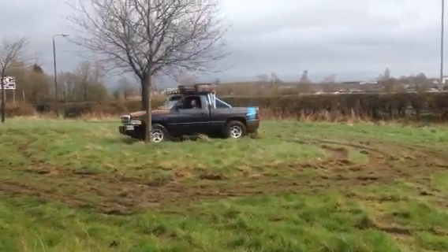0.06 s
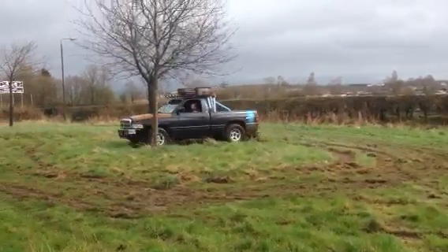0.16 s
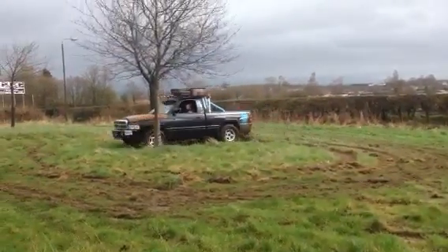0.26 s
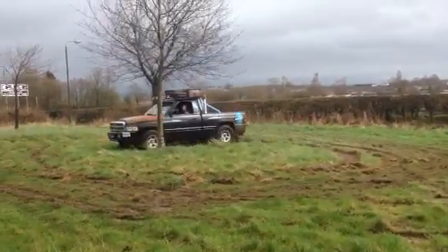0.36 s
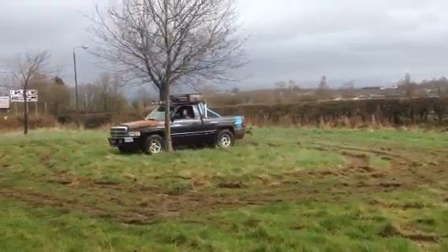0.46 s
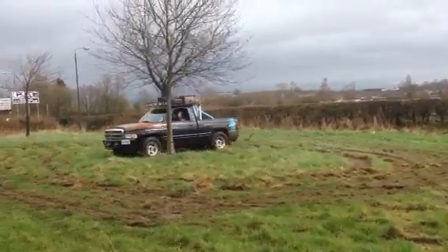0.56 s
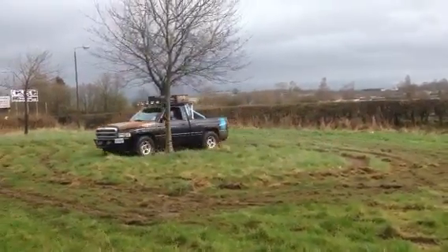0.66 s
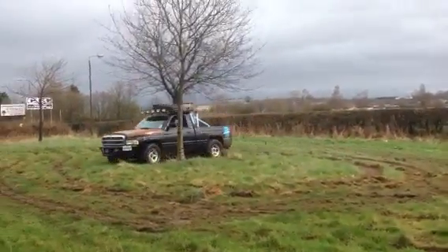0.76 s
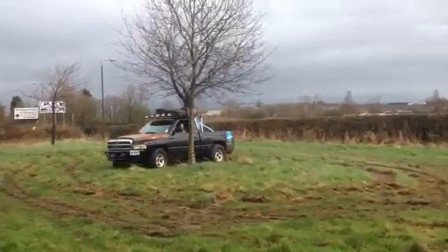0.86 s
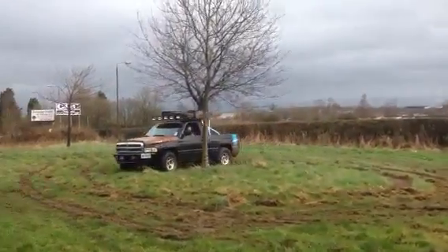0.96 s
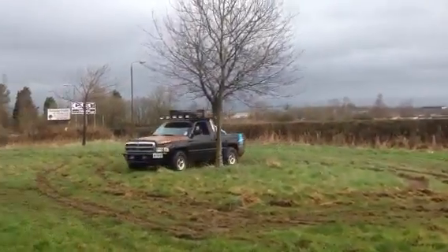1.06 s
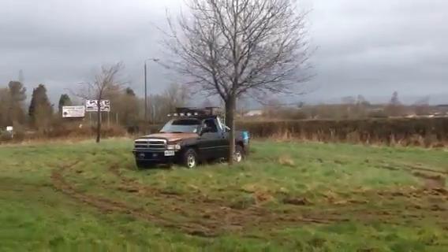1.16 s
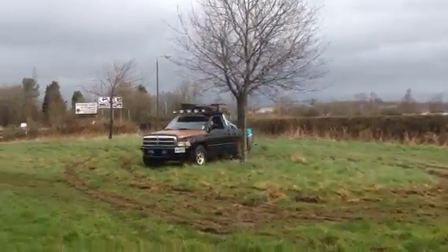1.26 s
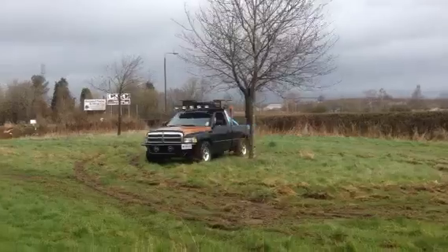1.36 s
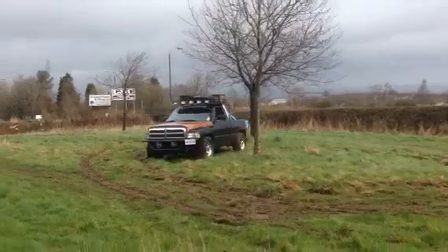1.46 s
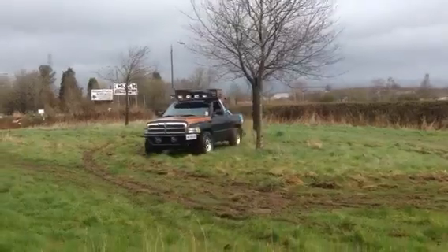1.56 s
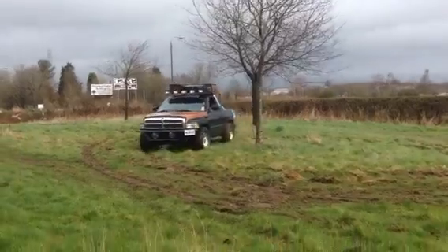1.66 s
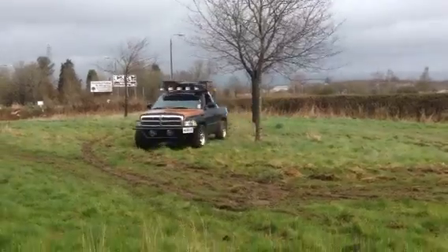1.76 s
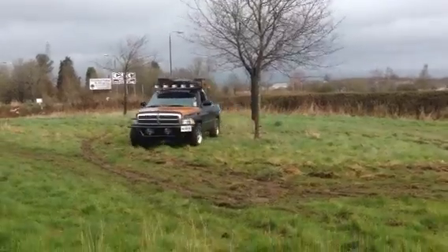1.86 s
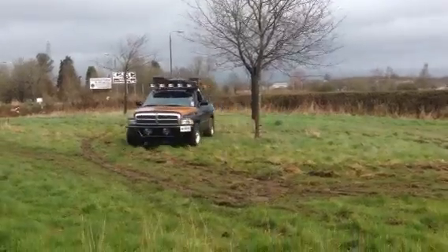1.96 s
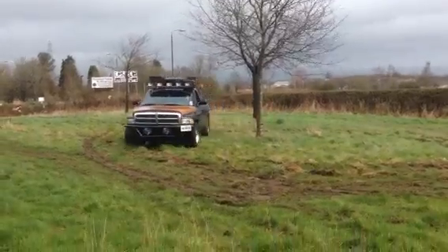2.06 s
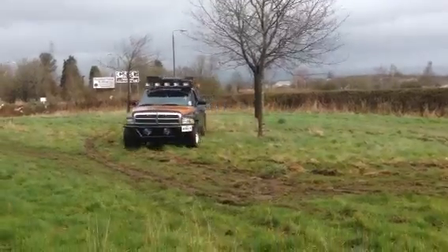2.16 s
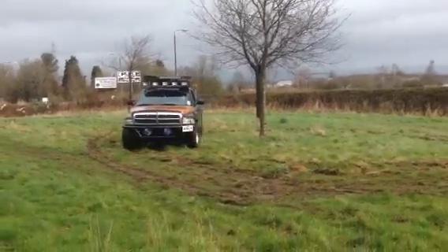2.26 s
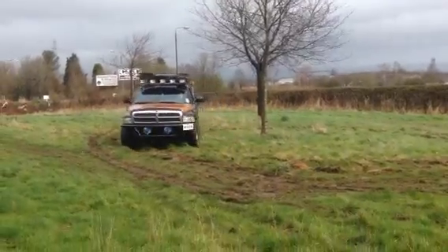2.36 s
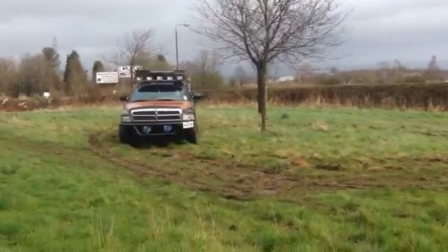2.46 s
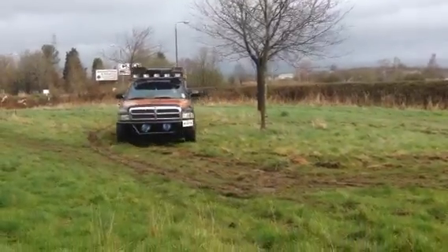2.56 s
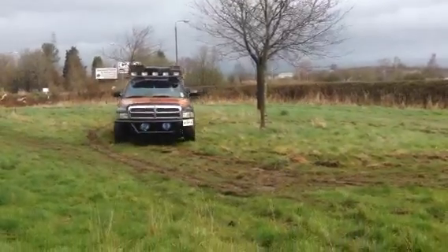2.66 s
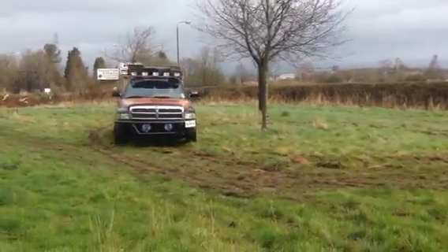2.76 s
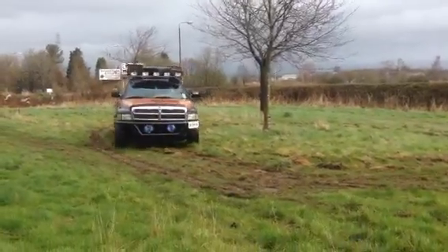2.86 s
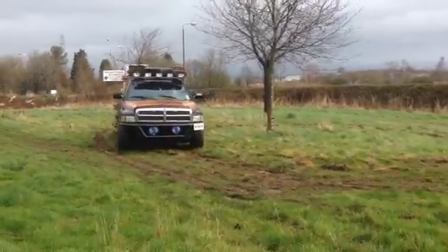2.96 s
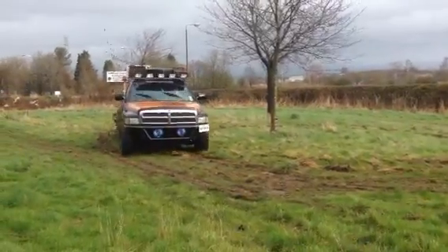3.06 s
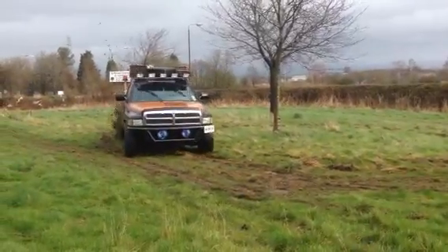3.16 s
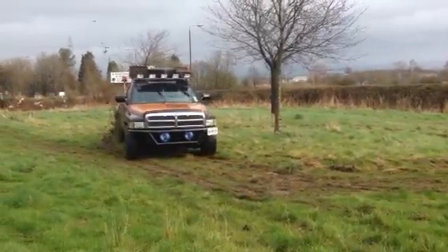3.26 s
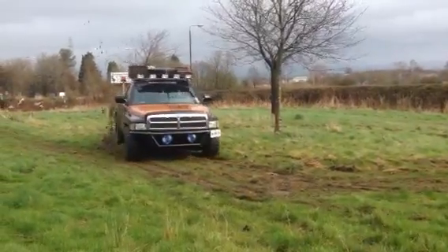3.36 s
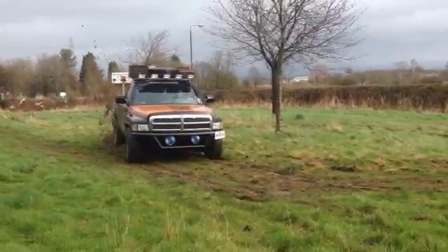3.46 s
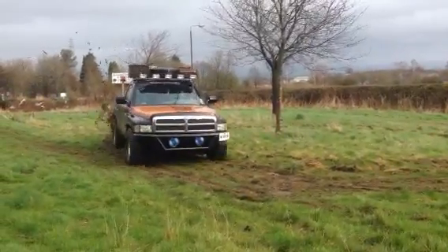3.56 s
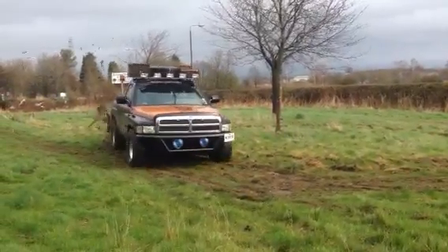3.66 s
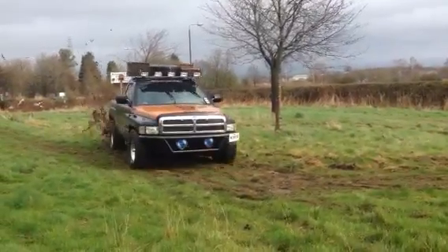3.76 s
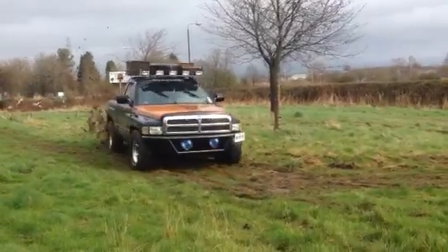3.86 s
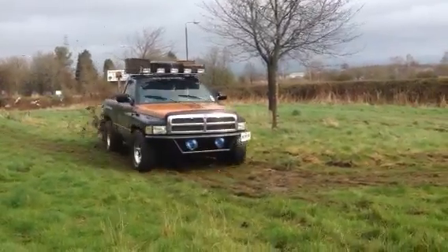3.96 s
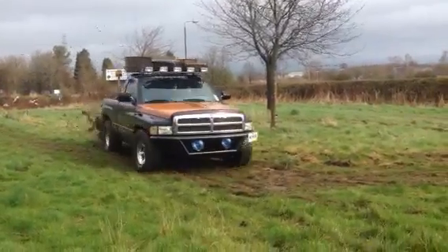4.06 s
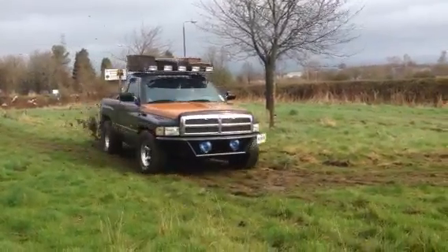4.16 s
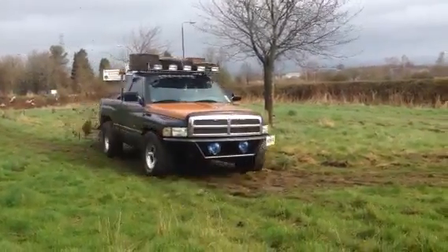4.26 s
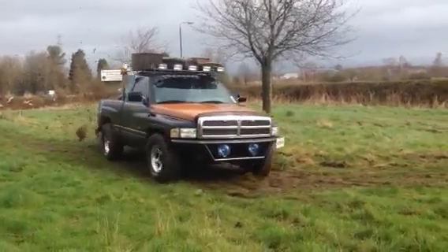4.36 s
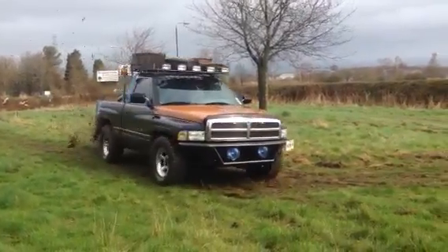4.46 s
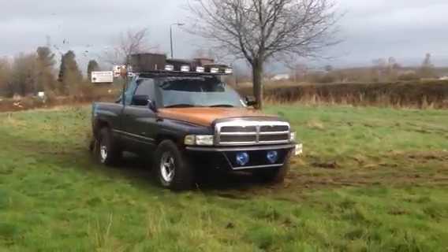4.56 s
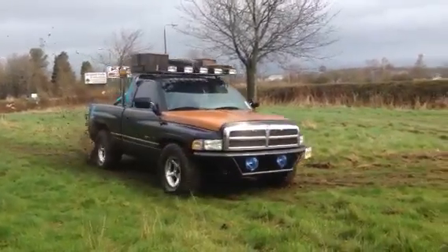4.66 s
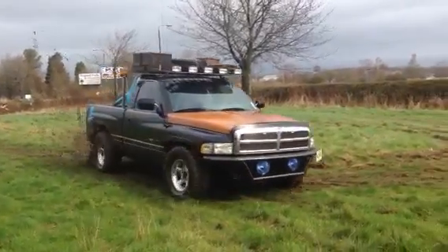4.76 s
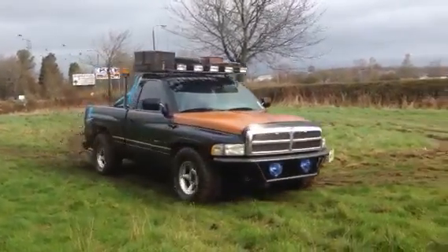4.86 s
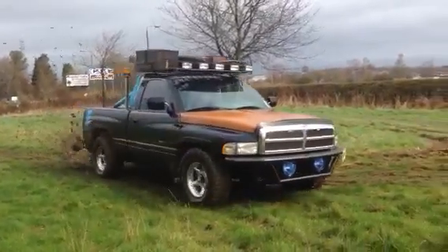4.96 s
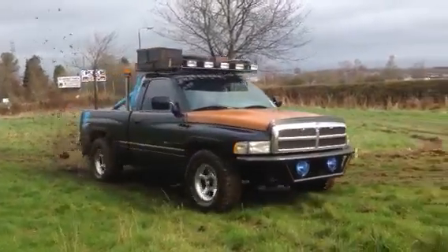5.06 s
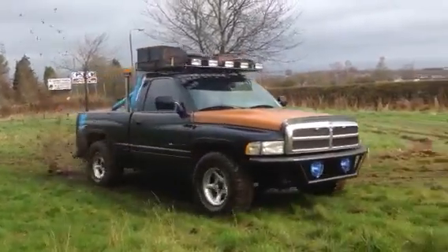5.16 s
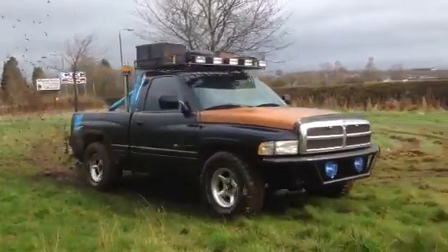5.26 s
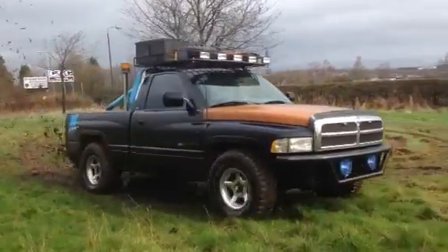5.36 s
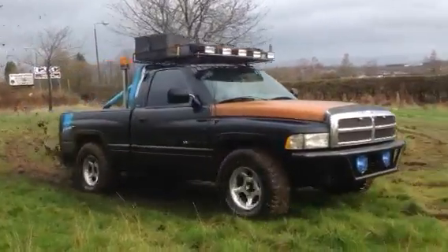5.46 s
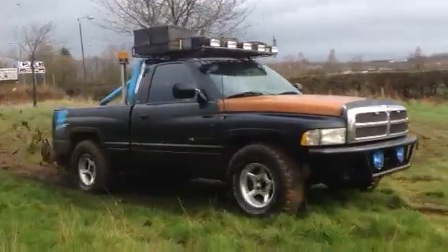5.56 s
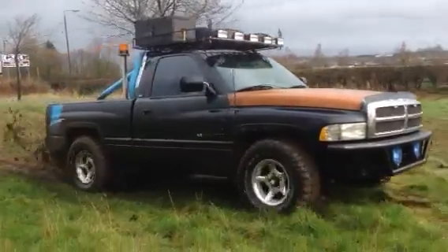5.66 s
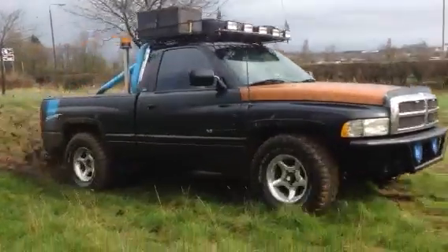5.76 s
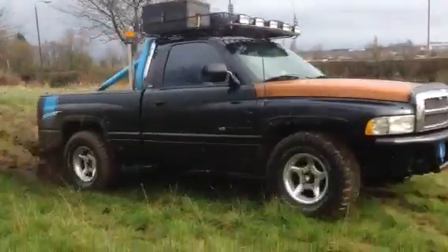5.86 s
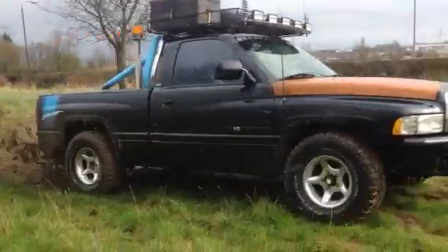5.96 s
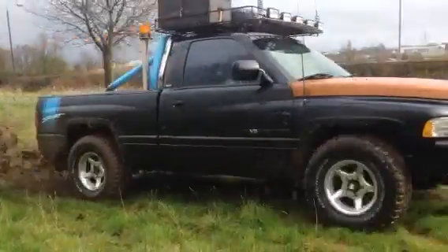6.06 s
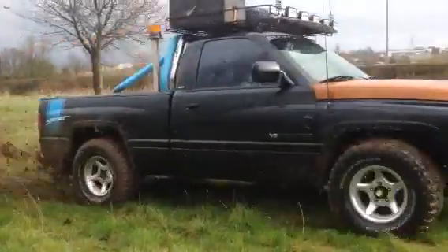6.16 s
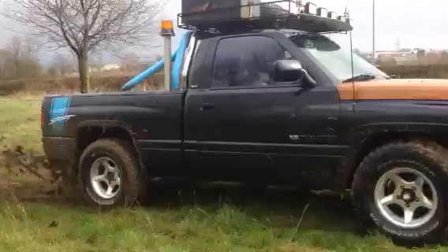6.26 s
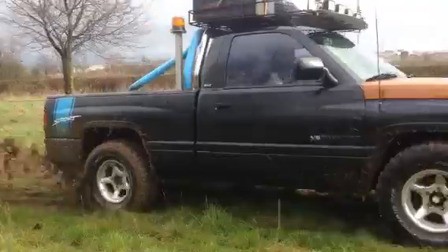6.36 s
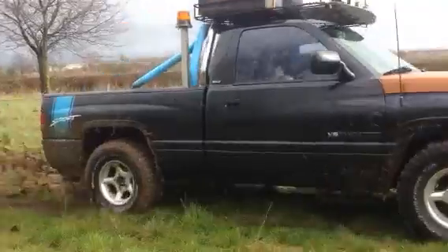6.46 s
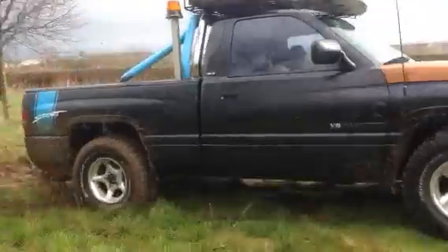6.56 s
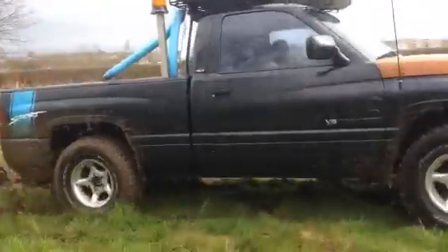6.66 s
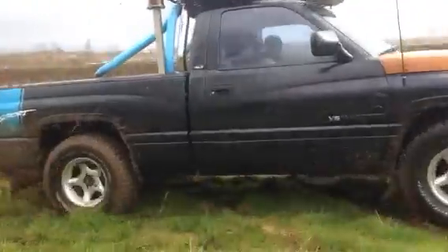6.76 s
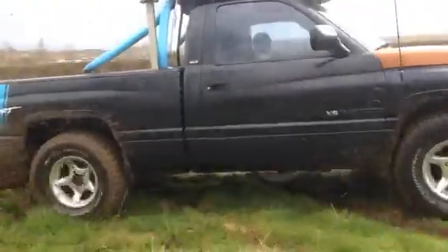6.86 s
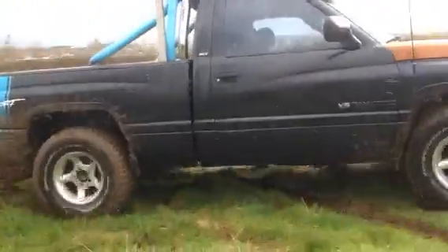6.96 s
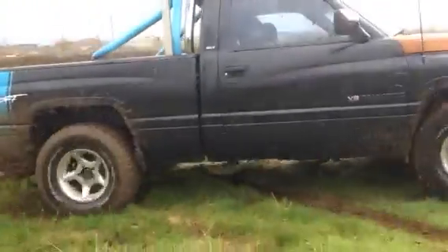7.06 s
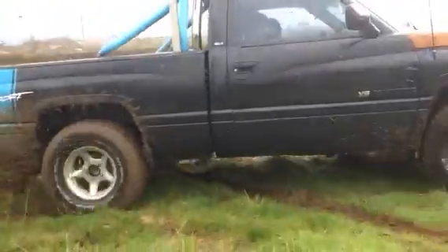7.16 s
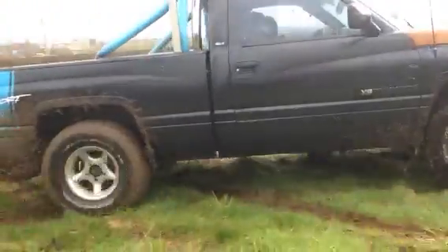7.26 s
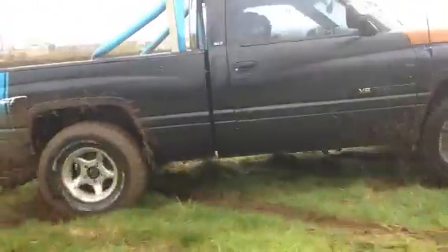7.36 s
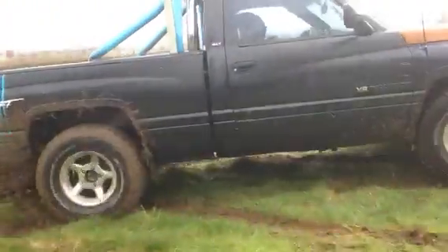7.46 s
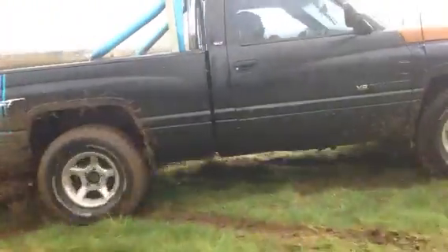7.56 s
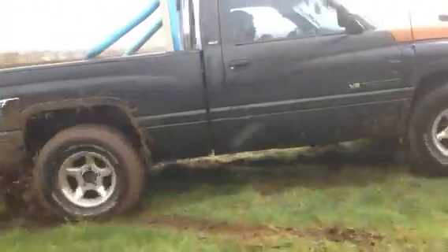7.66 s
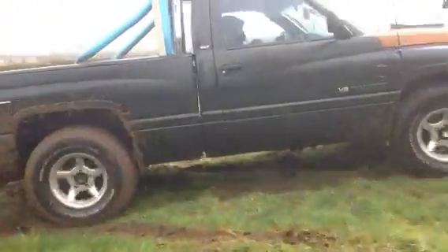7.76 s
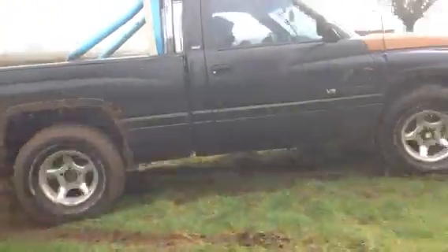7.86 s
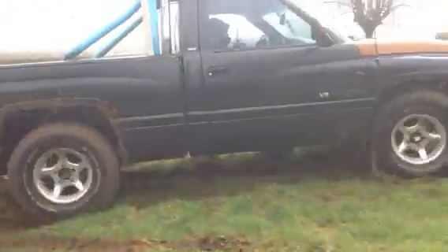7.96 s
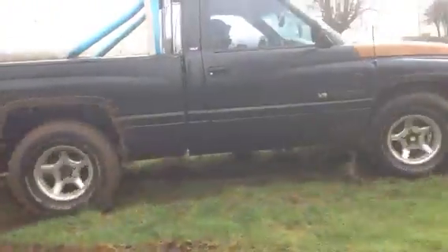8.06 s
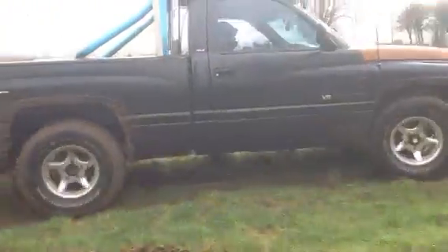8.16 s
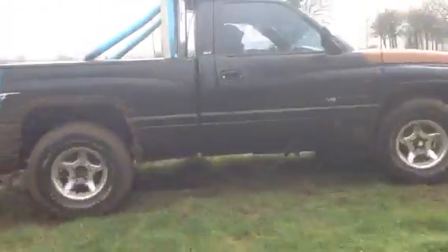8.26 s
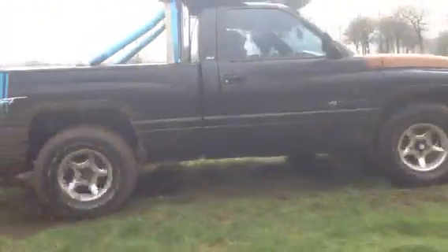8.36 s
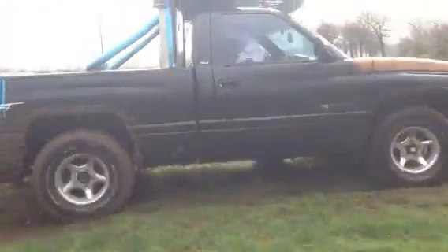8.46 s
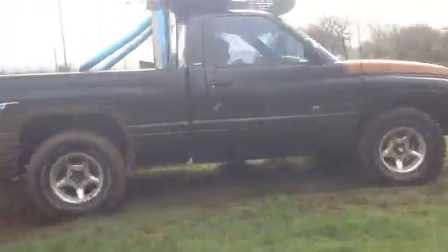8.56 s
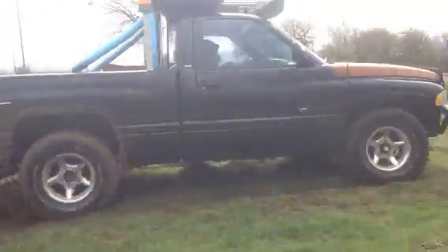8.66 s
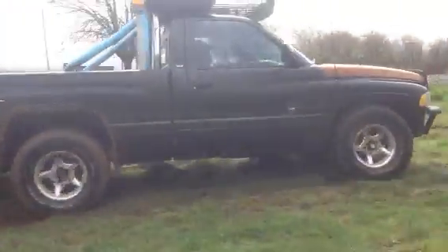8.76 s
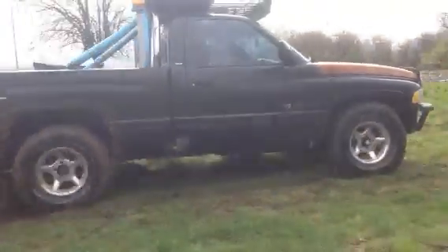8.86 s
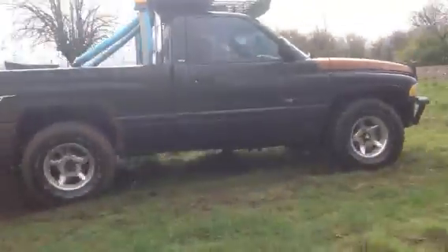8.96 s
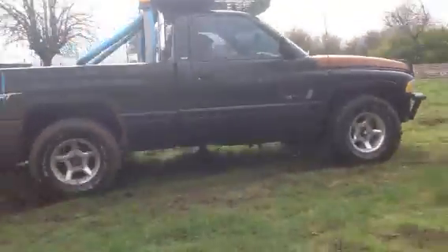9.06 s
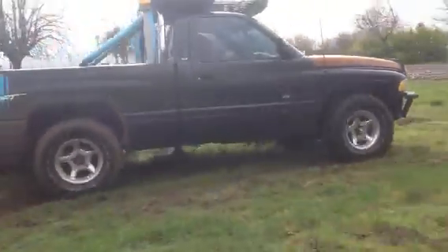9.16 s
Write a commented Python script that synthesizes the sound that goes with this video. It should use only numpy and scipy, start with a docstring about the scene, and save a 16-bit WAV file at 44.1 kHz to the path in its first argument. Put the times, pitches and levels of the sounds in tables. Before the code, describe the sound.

A big eight-cylinder pickup revs across wet grass, growling closer and sliding past with tyre hiss, mud spatter and wind buffeting the microphone.

```python
"""Pickup sliding on wet grass

A pickup with a cross-plane eight-cylinder engine circles and slides past close to the microphone.
The exhaust is a sum of orders of the engine cycle; fan roar, tyre hiss, spurts and spits are shaped noise,
with a breathy whistle of narrow resonances near the tailpipe and bright clicks of flung stones and mud.
Gusts rumble and pop on the microphone as low noise and short puffs, and a limiter holds the peaks."""
import sys
import numpy as np
from scipy import signal
from scipy.io import wavfile
from scipy.ndimage import uniform_filter1d, minimum_filter1d

SR = 44100
rng = np.random.default_rng(int(sys.argv[2]) if len(sys.argv) > 2 else 0)


def master(y):
    """Save y as 16-bit WAV."""
    cut = np.clip(np.atleast_2d(y).T, -1, 1)
    pcm = np.round(cut * 32767)  # scale
    wavfile.write(sys.argv[1], SR, pcm.astype(np.int16))


N = 407043


def amp(db):
    """Decibels to a linear factor."""
    return 10 ** (np.asarray(db) / 20)


def evened(x):
    """The signal scaled to rms 1."""
    return x / np.sqrt(np.mean(x ** 2) + 1e-20)


def columns(rows):
    """Every column of a curve table after the time, one value a sample."""
    s, *rest = np.transpose(rows)
    t = np.arange(N) / SR
    return [np.interp(t, s, c) for c in rest]


def wander(rate_hz):
    """Slow random drift: low-passed noise of rms 1."""
    count = int(N / SR * 200)  # 200 points a second
    low_pass = signal.butter(2, min(rate_hz / 100, .9))
    slow = signal.lfilter(*low_pass, rng.standard_normal(count))
    return np.interp(np.arange(N), np.linspace(0, N, count), evened(slow))


def band(x, lo_hz, hi_hz):
    """Band-pass filter with gentle edges."""
    return signal.sosfilt(signal.butter(2, [lo_hz, hi_hz], "band", fs=SR, output="sos"), x)


def noise(shape, patchy_db, size=1024):
    """Noise of rms 1 from random short-time spectra with drifting patches."""
    frames = N * 4 // size + 5
    hz = np.fft.rfftfreq(size, 1 / SR)
    real, imag, patches = rng.standard_normal((frames, len(hz), 3)).T
    patches = uniform_filter1d(patches, size=12, axis=0)  # smooth over frequency
    patches = evened(uniform_filter1d(patches, size=10, axis=1))  # and over time
    shape_hz, shape_db = np.transpose(shape)
    colour_db = np.interp(np.log(hz + 1), np.log(shape_hz + 1), shape_db)
    spectra = (real + 1j * imag) * amp(colour_db[:, None] + patchy_db * patches)
    return evened(signal.istft(spectra, nperseg=size, noverlap=size * 3 // 4)[1][:N])


def cycles():
    """Engine cycles turned so far; the flywheel keeps the speed from jumping."""
    # The driver pumps the throttle while the tyres grip and slip.
    # Each row: time in seconds, engine cycles per second before the flywheel smooths them.
    speed_rows = [(0, 18.7), (.22, 17.1), (.5, 18.4), (.75, 17), (1, 14), (1.2, 15.7), (1.32, 17.8),
                  (1.43, 19.4), (1.57, 20.7), (1.77, 19.6), (2.0, 20.65), (2.1, 20.3), (2.27, 18.3),
                  (2.68, 20.75), (2.88, 18.8), (3.08, 19.9), (3.3, 18.9), (3.48, 19.1), (3.66, 17.6),
                  (3.87, 18.3), (3.97, 19.2), (4.13, 21.3), (4.3, 20.3), (4.45, 20), (4.62, 19.1),
                  (4.84, 21), (5.06, 23.5), (5.27, 21.2), (5.39, 21.15), (5.55, 21.55), (5.72, 21.3),
                  (5.85, 20.85), (6.14, 20.5), (6.36, 19.8), (6.55, 19.7), (6.74, 19.2), (6.93, 19.45),
                  (7.05, 19.15), (7.27, 18.8), (7.38, 18.9), (7.49, 18.15), (7.7, 18.25), (7.9, 19.3),
                  (8.04, 19.1), (8.27, 19.5), (8.48, 20.4), (8.69, 20.15), (8.85, 20.3), (9.23, 18.65)]
    flywheel_s = .07
    speed = uniform_filter1d(columns(speed_rows)[0], size=round(flywheel_s * SR), mode="nearest")
    return np.cumsum(speed) / SR


def exhaust(turns):
    """Orders of the cycle; the uneven firing of one bank sets the phase of the strong ones."""
    # Strength of the firing. Each row: time in seconds, level in dB.
    load_rows = [(0, -62), (.3, -33), (.42, -40.5), (.6, -38.5), (.9, -38), (1.1, -34.5), (1.3, -29),
                 (1.45, -25), (1.65, -27.5), (1.95, -24.5), (2.22, -28.5), (2.55, -21), (2.82, -25.5),
                 (3.05, -22.5), (3.3, -23), (3.52, -23), (3.64, -26), (4.05, -18.5), (4.28, -21),
                 (4.4, -18.5), (4.53, -23), (4.75, -16), (4.95, -18.5), (5.16, -23.5), (5.3, -19.5),
                 (5.8, -19), (6.16, -19.5), (6.32, -27), (6.6, -21.5), (7.2, -22.5), (7.37, -23),
                 (7.75, -22.5), (8.2, -25), (8.65, -22), (8.8, -25.5), (8.95, -24), (9.23, -23)]
    # Side shown to the microphone. Each row: time in seconds, side (0 nose, 1 flank, 2 tail).
    facing_rows = [(0, 0.031), (3.8, 0.01), (5.2, 0.54), (5.9, 1.2), (6.6, 1.17), (7.7, 1.944),
                   (9.23, 2.04)]
    # The truck shows nose, flank and tail. Each row: time in seconds,
    # lift in dB over the load of the deep orders, order 11, order 13, order 16, order 21.
    turn_rows = [(0, 7, -9, -7, -11, -11), (1.1, 1.5, -6, -3, -10, -10), (1.4, -1.5, -10, -3, -14, -12),
                 (1.7, 2.5, -14, -6, -7, -12), (2.1, 0.5, -12, -8, -9, -14), (2.5, 2.5, -9, -6, -14, -18),
                 (3.2, 0, -11, -12, -8, -11), (3.5, 3.5, -10, -9, -10, -12), (3.95, 3, -13, -11, -12, -16),
                 (4.35, -1, -19, -7, -4, -11), (4.7, 0.5, -15, -9, -14, -10), (5.05, -2, -4, -6, -7, -12),
                 (5.3, 0, -19, -10, -4, -8), (5.7, 1.5, -22, -10, -3, 0), (5.95, 2.5, -24, -17, -2, 0),
                 (6.4, 4, -14, -3, -5, -3), (6.85, 4.5, -20, 4, -6, 2), (7.3, 5.5, -22, 7, -2, 3),
                 (7.6, 5, -17, 1, -1, 5), (7.95, 2, -7, 8, 2, 8), (8.3, 2, -3, 7, 4, 6),
                 (8.6, 1.5, -4, 3, 3, 2), (9.23, -1, -9, 7, 4, 3)]
    # A thin tone sings for a while. Each row: time in seconds, centre in Hz, mean level in dB.
    sing_rows = [(0, 616, -63), (5.15, 638, -54), (5.3, 630, -30), (5.55, 619, -37), (5.9, 614, -37.5),
                 (6.1, 593, -60), (8.3, 568, -53), (8.45, 591, -36), (8.9, 591, -36), (9.0, 570, -60),
                 (9.23, 560, -66)]
    # Strong orders of the engine cycle, one number each.
    strong = (3, 5, 8, 11, 13, 16, 21)
    # Offset of each strong order in dB, added to load and lift.
    strong_offset_db = [-15, 0, 0.5, -0.5, 0.5, 1, -14.5]
    follows = (0, 0, None, 1, 2, 3, 4)
    # Firing slots, out of eight in a cycle, of the bank that faces the microphone.
    bank = (0, 3, 5, 6)
    # The pipes smear each pulse: radians per order squared, heard from nose, flank, tail.
    spread_sides = (-.025, 0, -.012)
    # Weak orders from unequal cylinders, in three groups.
    # Each entry: order, then dB over its group heard from nose, flank, tail.
    low_weak = {2: (-25, -23, -11), 4: (-2, -20, -11), 6: (-1.5, 0.83, 3.5), 7: (-1.6, 0.1, 0.1),
                9: (-5, -7, -1), 10: (4.3, -11.5, 0.1), 12: (-8, -2, 2.3)}
    mid_weak = {14: (-11, -12, -12), 15: (-6, -9, -5.5), 17: (-12, -9, -10), 18: (-15, -8, -8)}
    top_weak = {19: (1.4, -5, 8.1), 20: (-2.5, -4.5, 2.72), 22: (0, -11, -6.5), 23: (-13, -12, -14),
                24: (-9.5, -6.5, -6), 25: (-11, -20, -10), 26: (-11, -15, -9), 27: (-13, -17, -11.5)}
    tail_lag = 2.1  # radians by which orders from twice the firing rate up trail at the tail
    low_share, low_at_db = 0.65, -20  # the low weak orders follow the load only in part

    load_db, facing = columns(load_rows)[0], columns(facing_rows)[0]
    lifts_db = columns(turn_rows)
    strong_db = [load_db + db + (0 if c is None else lifts_db[c])
                 for c, db in zip(follows, strong_offset_db)]
    spread = np.interp(facing, range(3), spread_sides)

    sing_hz, sing_db = columns(sing_rows)
    sing_phase = 2 * np.pi * np.cumsum(sing_hz + 5 * wander(25)) / SR
    out = amp(sing_db + 2.0 * wander(12)) * np.cos(sing_phase)

    for k, db in zip(strong, strong_db):
        firing = np.angle(sum(np.exp(-2j * np.pi * k * slot / 8) for slot in bank))
        lag = tail_lag * (k >= 16) * np.maximum(facing - 1, 0)
        drift = .3 * wander(.4) + .005 * k * wander(10)
        phase = 2 * np.pi * k * turns + firing + spread * k ** 2 - lag + drift
        out += amp(db + .7 * wander(14)) * np.cos(phase)

    low_db = low_share * load_db + low_at_db
    # the middle group lies around order 16, the top group around order 21
    groups = ((low_db, low_weak), (strong_db[-2], mid_weak), (strong_db[-1], top_weak))
    for group_db, orders in groups:
        for k, sides_db in orders.items():
            # nearly in step, spread by the pipe: one swell of about half a cycle
            drift = .9 * wander(.6) + .008 * k * wander(10)
            phase = 2 * np.pi * k * (turns - .55) + .33 * (k - 16) ** 2 + drift
            side_db = np.interp(facing, range(3), sides_db)
            db = group_db + side_db + 2.0 * wander(1.4) + 1.6 * wander(10)
            out += amp(db) * np.cos(phase)
    return np.sqrt(2) * out  # a cosine of rms 1 stands for 0 dB


def spits(turns):
    """Short jets of gas from two cylinders: noise that leaps and dies once a cycle for each."""
    # They sharpen as the tailpipe comes round.
    # Each row: time in seconds, first and second cylinder in dB before the last filter.
    spit_rows = [(0, -82, -85), (7.4, -55, -64), (7.8, -53, -47), (8.2, -39, -44), (8.5, -37, -42),
                 (8.9, -39, -50), (9.23, -59, -50)]
    # Places of the two spits in the cycle, as a share of it.
    spit_at = (.58, .87)
    gate = 0
    for at, db in zip(spit_at, columns(spit_rows)):
        decay = np.exp(-((turns - at) % 1) / .05)
        gate = gate + amp(db) * evened(decay)
    gas = evened(band(rng.standard_normal(N), 900, 2600))
    return amp(2 * wander(20)) * band(gate * gas, 800, 2800)


def running_gear(turns):
    """Roar and hiss puff once a cycle and with every firing, and flutter together."""
    # Each row: time in seconds, roar of fan and block in dB, hiss of tyres and spray in dB
    # before its dulling.
    level_rows = [(0.0, -58, -63), (0.77, -54, -57.5), (1.1, -53.5, -55), (1.46, -44.5, -48.5),
                  (2.16, -47, -49), (2.7, -42, -45.5), (2.88, -44, -49.5), (3.37, -40, -44.5),
                  (3.55, -39.5, -46), (3.91, -38.5, -41.5), (4.06, -30, -35.5), (4.2, -32, -37.5),
                  (4.32, -33.5, -41.5), (4.6, -32, -38), (4.94, -26, -33.5), (5.22, -28, -33),
                  (5.42, -28, -37), (5.86, -27, -34.5), (6.12, -27.5, -37), (6.32, -35, -43),
                  (6.68, -34, -39), (7.12, -31, -40), (7.3, -31, -34.5), (7.42, -33.5, -40.5),
                  (7.78, -30, -33.5), (7.97, -31, -38.5), (8.41, -31.5, -36), (8.7, -29.5, -38),
                  (9.23, -33, -37.5)]
    # Colour of the roar. Each row: frequency in Hz, density in dB per Hz.
    roar_shape = [(300, -27), (420, 0), (550, -3), (800, 2), (1200, -2), (1700, -2), (2400, -6.5),
                  (3200, -13), (5000, -20.5), (8000, -56), (15000, -74)]
    # Colour of the hiss. Each row: frequency in Hz, density in dB per Hz.
    hiss_shape = [(880, -55), (1500, -18), (2090, -3), (2740, -9.5), (3390, -4), (5520, -6.5),
                  (10400, -15.5), (14000, -21), (15300, -23)]
    roar_db, hiss_db = columns(level_rows)
    puff = np.cos(2 * np.pi * (turns - .75))
    firing = np.cos(2 * np.pi * 8 * turns)
    flutter, bite = wander(35), wander(6.5)  # the tyres bite and slip
    roar_db_now = roar_db + 0.31 * puff + 0.5 * firing + 0.57 * flutter + 0.84 * bite
    hiss_db_now = hiss_db + 0.13 * puff + 1.0 * firing + 0.87 * flutter + 0.55 * bite
    roar = amp(roar_db_now) * noise(roar_shape, patchy_db=1.2)
    hiss = amp(hiss_db_now) * noise(hiss_shape, patchy_db=1.2)
    # hiss above -36.5 dB loses a share of what lies outside the band, 0.03 for each dB
    dull = np.clip((hiss_db + 36.5) * 0.03, 0, .9)
    return roar + hiss - dull * (hiss - band(hiss, 300, 8700))


def whistle(turns):
    """Breath near the tailpipe: noise in two narrow moving resonances, pulsing once a cycle."""
    # Each row: time in seconds, lower resonance in Hz, level in dB that both resonances share.
    whistle_rows = [(0, 1170, -93), (7.3, 1204, -42.5), (7.7, 1203, -36.5), (8.0, 1196, -36.5),
                    (8.4, 1179, -33), (8.7, 1165, -37.5), (9.1, 1157, -38.5), (9.23, 1170, -43)]
    hz, db = columns(whistle_rows)
    out = np.zeros(N)
    for ratio, rel_db, width_hz in ((1, 0.5, 37), (1.15, -1.5, 90)):
        r = np.exp(-np.pi * width_hz / SR)
        rough = rng.standard_normal(N) + 1j * rng.standard_normal(N)
        slow = signal.lfilter([1], [1, -r], rough)
        carrier = np.exp(2j * np.pi * np.cumsum(ratio * hz) / SR)
        out += amp(rel_db) * evened((slow * carrier).real)
    return amp(db + 1.3 * np.cos(2 * np.pi * (turns - .7))) * out


def spurts():
    """Gritty bursts as the tyres bite and fling mud: dense grains in a bell-shaped swell."""
    # Each row: time of the height in seconds, level there in dB, centre in Hz,
    # length in ms (two standard deviations of the swell).
    spurt_rows = [(4.06, -45, 2200, 60), (4.432, -31.5, 2200, 22.6), (4.95, -32, 2204, 28),
                  (5.22, -24.5, 2423, 29), (5.66, -31.5, 1947, 45), (6.049, -48, 1998, 50),
                  (7.268, -32.5, 1900, 45), (8.384, -29, 2740, 18), (8.441, -30, 2480, 15),
                  (8.53, -37, 2700, 22), (8.659, -33.5, 2980, 17)]
    out = np.zeros(N + 8000)
    t = (np.arange(8000) - 4000) / SR
    for s, db, hz, ms in spurt_rows:
        grain_db = 7.9 * evened(uniform_filter1d(rng.standard_normal(len(t)), size=40))
        grains = rng.standard_normal(len(t)) * amp(grain_db)
        swell = np.exp(-.5 * (t * 2000 / ms) ** 2)
        burst = swell * evened(band(grains, .7 * hz, 1.3 * hz))
        out[round(s * SR) - 4000:][:len(t)] += amp(db) * burst
    return out[:N]


def ticks():
    """Flung stones and mud: single bright clicks of quickly dying noise."""
    # Each row: start in seconds, peak in dB.
    tick_rows = [(1.3829, -34), (3.318, -23), (4.9523, -24), (6.2813, -33), (6.9543, -26), (8.6055, -20),
                 (8.637, -18), (8.796, -17.5)]
    out, t = np.zeros(N + 400), np.arange(400) / SR
    for s, db in tick_rows:
        click = band(rng.standard_normal(len(t)) * np.exp(-t / .0012), 1800, 7000)
        out[round(s * SR):][:len(t)] += amp(db) * click / abs(click).max()
    return out[:N]


def wind():
    """Lumpy low noise on the microphone: a light breeze that swells with each gust."""
    # Each row: time of the height in seconds, level there in dB before breeze and lumps,
    # length in seconds (three standard deviations of the swell).
    gust_rows = [(0.152, -23.5, 0.33), (0.765, -18, 0.086), (0.91, -25, 0.16), (1.404, -31, 0.37),
                 (1.594, -29.5, 0.15), (1.896, -29, 0.26), (2.668, -25, .12), (3.11, -22.5, 0.19),
                 (3.31, -22, 0.083), (3.52, -25.5, .2), (3.858, -29, 0.32), (4.174, -34, 0.17),
                 (4.973, -23, 0.088), (6.23, -17, 0.18), (6.63, -17.5, 0.09), (6.91, -26, .4),
                 (7.484, -19.5, 0.35), (8.344, -29.5, 0.58), (8.781, -17.5, 0.12), (8.963, -22, 0.13)]
    # Colour of the wind. Each row: frequency in Hz, density in dB per Hz.
    wind_shape = [(15, -36), (30, -26), (45, -2.5), (80, 7), (130, 5), (250, -4), (400, -10.5),
                  (600, -19.5), (1000, -28), (3000, -79)]
    t = np.arange(N) / SR
    swell = amp(-33)  # the breeze
    for s, db, length in gust_rows:
        swell = swell + amp(db) * np.exp(-.5 * ((t - s) * 3 / length) ** 2)
    lumps_db = 3 * wander(30)
    return swell * amp(lumps_db) * noise(wind_shape, patchy_db=-0.5, size=2048)


def pops():
    """Eddies bursting on the microphone: each puff is a thump, a slap and a shorter crackle."""
    # Each row: time in seconds (the puff starts 2 ms ahead), peak in dB of slap, thump and crackle,
    # rise of the puff to its height in ms.
    pop_rows = [(0.098, -28, -15, -49, 4.3), (0.109, -22, -9, -35, 3.6), (0.122, -26, -3.5, -12.5, 2.7),
                (0.13, -17, -12, -38, 2.4), (0.147, -19, -23, -44, 1.7), (0.153, -25, -34, -38, 3.6),
                (0.161, -24, -17.5, -50, 4.3), (0.18, -15, -20, -44, 2.4), (0.19, -13.5, -14.5, -19, 3.2),
                (0.203, -26, -22, -54, 2.6), (0.265, -27, -29, -61, 5.3), (0.29, -38, -19, -60, 3.2),
                (0.327, -23.5, -33, -59, 1.4), (0.533, -45, -22.5, -56, 4), (0.736, -45, -27, -50, 2.4),
                (0.755, -10.5, -5.5, -48, 2.56), (0.769, -31, -22, -51, 2.5), (0.794, -28, -33, -53, 3.5),
                (0.826, -35, -16.5, -54, 2.5), (0.87, -17, -8, -58, 2.3), (0.927, -33, -24, -52, 1.4),
                (0.958, -32, -17, -55, 1.9), (3.107, -22, -5.5, -47, 1.7), (5.74, -17, -10, -32, 2.8),
                (6.129, -17, -10.5, -29, 4.1), (6.222, -15, -11, -35, 4), (6.236, -9.5, -11, -28, 4.4),
                (6.268, -15, -6, -34, 4.3), (6.284, -10, 1.5, -8.5, 1.9), (6.325, -15, -6, -28, 3.9),
                (6.47, -14.5, -26, -35, 3.1), (6.598, -20, -11, -38, 3.9), (6.626, -25, -21, -39, 4.6),
                (7.368, -21, -11, -21, 2.1), (7.547, -30, -28, -35, 3), (8.781, -32, -9, -38, 4.7)]
    out, t = np.zeros(N + 3000), np.arange(3000) / SR
    for s, slap_db, thump_db, crackle_db, ms in pop_rows:
        rough, rise_s = rng.standard_normal((2, len(t))), ms / 1000
        puff = (t / rise_s) ** 3 * np.exp(3 - 3 * t / rise_s)
        tone = np.sin(2 * np.pi * 280 * t) + 0.48 * np.sin(2 * np.pi * 560 * t)
        thump = band(tone * puff, 67, 910)
        slap = band(band(rough[0] * puff, 350, 1250), 250, 2200)
        crackle = band(band(rough[1] * puff ** 2, 1000, 2500), 900, 3200)
        parts = ((thump_db, thump), (slap_db, slap), (crackle_db, crackle))
        start = max(round((s - .002) * SR), 0)
        out[start:][:len(t)] += sum(amp(db) * part / abs(part).max() for db, part in parts)
    return out[:N]


def scene():
    """The truck, its sounds tied to one engine, and the wind on the microphone."""
    turns = cycles()
    truck = exhaust(turns) + spits(turns) + running_gear(turns) + whistle(turns) + spurts() + ticks()
    return (truck + wind() + pops())[None]


def record(dry):
    """A quick limiter holds the peaks under its ceiling; then a low-pass ends the treble."""
    gain = np.minimum(1, .715 / (abs(dry) + 1e-9))  # ceiling as a share of full scale
    gain = minimum_filter1d(gain, size=121, axis=1)
    gain = uniform_filter1d(gain, size=121, axis=1)
    low_pass = signal.firwin(1023, 15350, window=("kaiser", 9), fs=SR)  # edge in Hz
    return signal.oaconvolve(dry * gain, low_pass[None], "same")


dry = scene()
out = record(dry)
master(out)
```